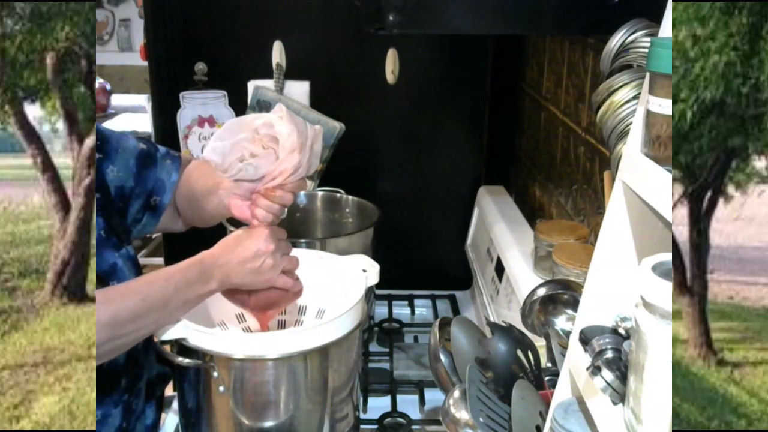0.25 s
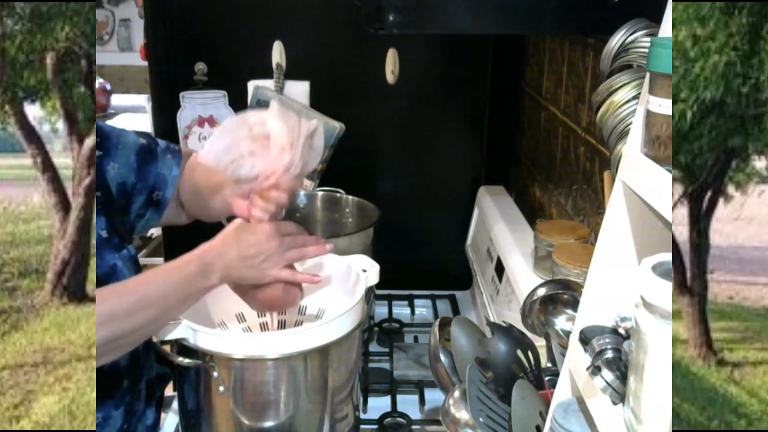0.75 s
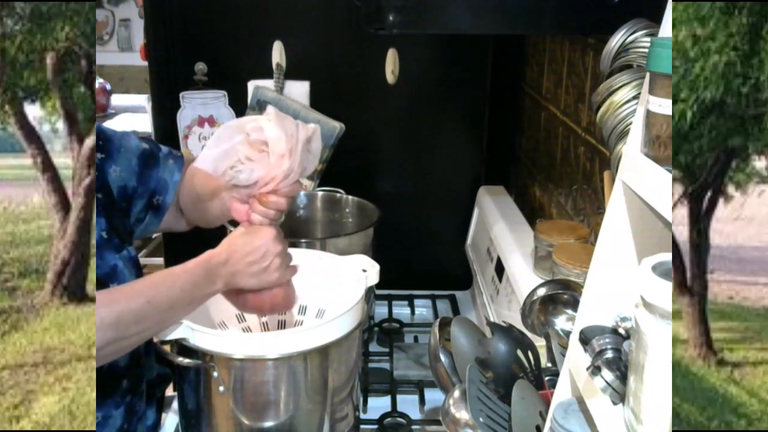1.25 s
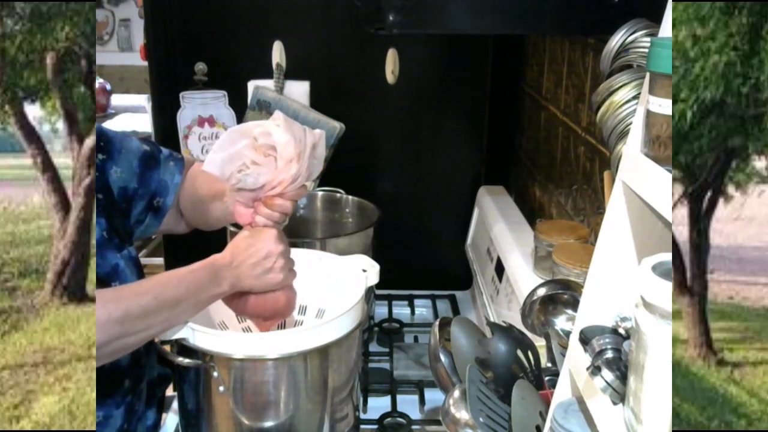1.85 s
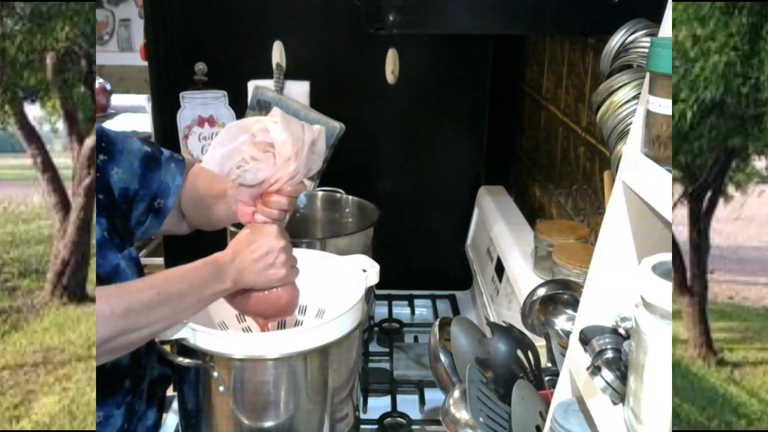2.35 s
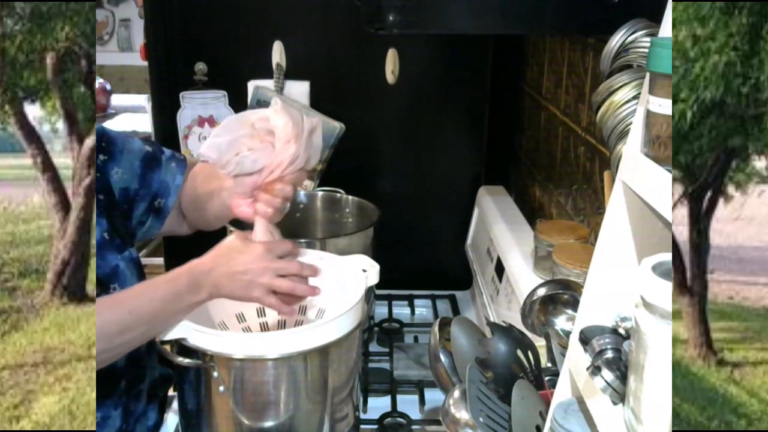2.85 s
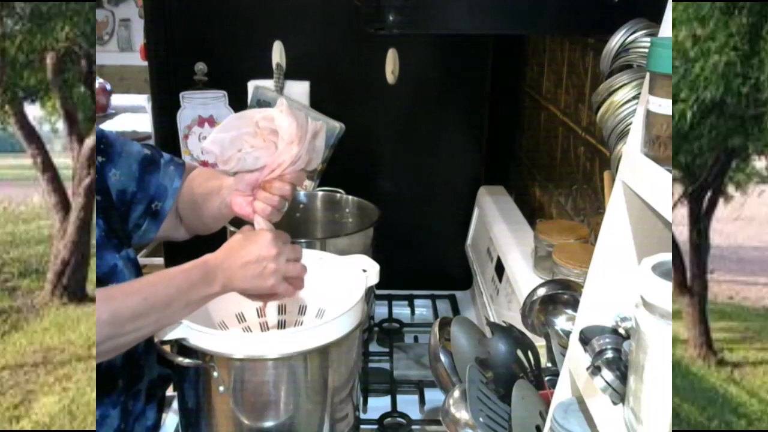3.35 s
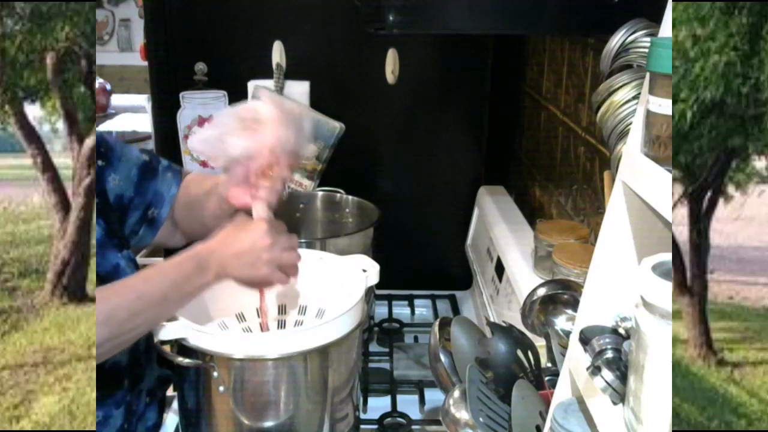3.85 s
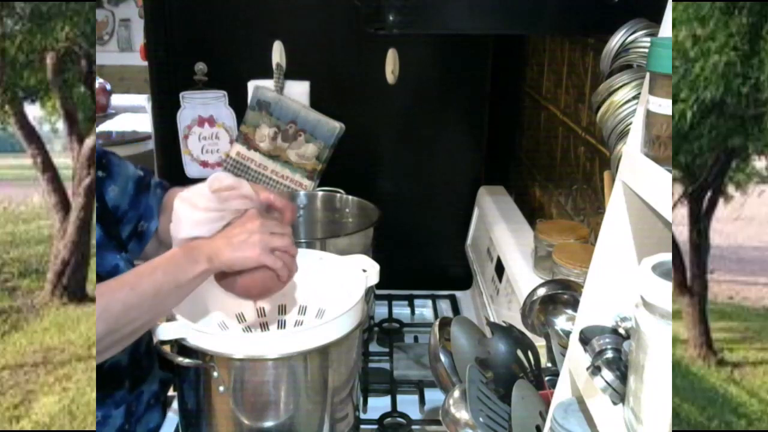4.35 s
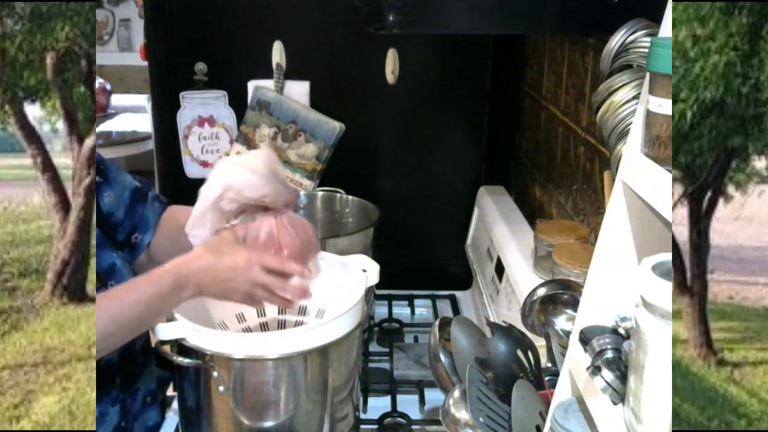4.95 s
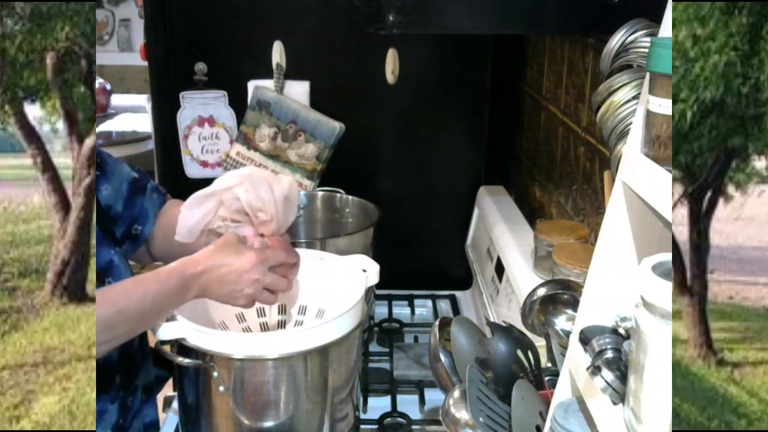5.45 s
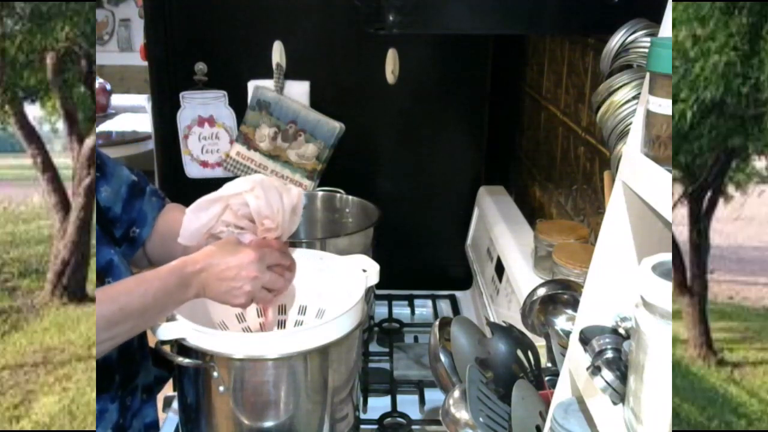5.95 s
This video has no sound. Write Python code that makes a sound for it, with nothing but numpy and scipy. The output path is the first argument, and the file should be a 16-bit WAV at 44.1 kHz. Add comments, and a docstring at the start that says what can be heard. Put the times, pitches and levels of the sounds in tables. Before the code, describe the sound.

Wet, frothy squeezing of a juice-soaked cloth over a metal pot, with bright bubble pops, brief squishes and hollow trickling run-off.

```python
"""Fruit pulp is wrung in a cloth bag over a colander in a tall steel pot, in a small kitchen.
From the start a squeeze presses froth through the weave, a noise crackle with ringing bubbles, while the
run-off gurgles through the pot's resonances over a low noise rumble and still air. Glided plunks, bright
pops and brief squishes join in turn; squeezes crowd together after 3 s, thin out after 4.6 s and return
from 5.4 s to the end."""
import sys
import numpy as np
from scipy import signal
from scipy.fft import rfft, irfft
from scipy.io import wavfile
from scipy.ndimage import uniform_filter1d

SR = 44100
rng = np.random.default_rng(int(sys.argv[2]) if len(sys.argv) > 2 else 0)


def unload_wav(signal):
    """Save mono or channel-first audio to the path in sys.argv[1] as 16-bit WAV at rate SR, clipped to [-1, 1]."""
    wavfile.write(
        sys.argv[1],
        SR,
        np.round(np.clip(np.atleast_2d(signal).T, -1, 1) * 32767).astype(np.int16),
    )


N = 272979
TIME = np.arange(N) / SR


def from_db(db):
    """Decibels to gain."""
    return 10 ** (np.asarray(db) / 20)


def rms_one(x):
    """Scale to rms 1."""
    return x / np.sqrt(np.mean(x ** 2) + 1e-20)


def in_time(rows):
    """Each column of a curve, interpolated at every sample."""
    s, *columns = np.transpose(rows)
    return [np.interp(TIME, s, c) for c in columns]


def add(out, s, sound):
    """Mix a sound in at a time in seconds."""
    at = int(np.clip(s * SR, 0, N - 1))
    out[at:at + len(sound)] += sound[:N - at]


def drift(knots_per_s):
    """Random curve: unit-spread Gaussian knots joined by lines."""
    knots = rng.standard_normal(2048)
    return np.interp(TIME * knots_per_s, np.arange(len(knots)), knots)


def colour(x, spectrum):
    """Filter by a curve in dB over log frequency."""
    hz, db = np.transpose(spectrum)
    grid = np.maximum(np.fft.rfftfreq(N, 1 / SR), 1)
    gain = from_db(np.interp(np.log(grid), np.log(hz), db))
    return irfft(rfft(x) * gain, N)


def even(x, span_s):
    """Hold the short-term rms at 1, leaving the grain."""
    power = uniform_filter1d(x ** 2, int(span_s * SR) + 1)
    return x / np.sqrt(np.abs(power) + 1e-12)


def resonance(x, hz, t60):
    """Two-pole ringing band, about unit gain at its peak; t60 in seconds."""
    r = from_db(-60 / (t60 * SR))
    zeros = (1 - r * r) / 2 * np.array([1, 0, -1])
    poles = [1, -2 * r * np.cos(2 * np.pi * hz / SR), r * r]
    return signal.lfilter(zeros, poles, x + 1e-18)


def bubble(hz, cycles, rise, swell):
    """A bubble swells, rings and glides in pitch as it nears the surface; envelope peak 1."""
    t60_samples = cycles / hz * SR
    age = np.arange(int(t60_samples) + 2) / t60_samples
    shape = (1 - np.exp(-age / swell)) * np.exp(-np.log(1000) * age)
    phase = 2 * np.pi * hz / SR * np.cumsum(1 + rise * (age - swell))
    return shape / shape.max() * np.sin(phase)


def stream(per_s, low_hz, high_hz, cycles, rise, spread_db):
    """Bubbles of many sizes form at random; most are faint, a few stand out."""
    out = np.zeros(N)
    for when, size, strength, sign in rng.random((16000, 4))[:int(per_s * N / SR)]:
        ring = bubble(low_hz * (high_hz / low_hz) ** size, cycles, rise, swell=0.042)
        gain = from_db(spread_db * min(-np.log(1 - strength), 4))
        add(out, when * N / SR, np.sign(sign - .5) * gain * ring)
    return out


def scatter(x, t60, delay_s):
    """A dense decaying cloud of reflections with unit energy."""
    t = TIME[:SR // 2]
    echoes = rng.standard_normal(len(t)) * np.exp(-np.log(1000) * t / t60) * (t > delay_s)
    return signal.fftconvolve(x, echoes / np.linalg.norm(echoes))[:N]


HANDS_MOVE_PER_S = 9


def shifting_scatter(x, t60, delay_s, count=3):
    """The bag moves in the hands, so its early reflections keep changing."""
    shares = np.array([drift(HANDS_MOVE_PER_S) for _ in range(count)])
    shares /= np.linalg.norm(shares, axis=0)
    return sum(scatter(x * share, t60, delay_s) for share in shares)


def kitchen(x, near_db, far_db):
    """Colander and stove answer at once, the walls later; loudness is roughly kept."""
    near, far = from_db(near_db), from_db(far_db)
    early = near * shifting_scatter(x, t60=0.083, delay_s=0.0017)
    late = far * scatter(x, t60=0.38, delay_s=0.0041)
    return (x + early + late) / np.sqrt(1 + near ** 2 + far ** 2)


# Ringing of the pot's steel wall. Each row: frequency in Hz, level in dB against ring_db.
STEEL_MODES = [(3400, 5), (3924, -4), (4295, -8), (4857, 5.5), (5834, -20), (6282, -3), (6816, 3),
               (7266, -4.5), (8048, -13)]


def steel(x, ring_db, t60):
    """Sharp sounds set the pot wall ringing faintly."""
    return x + sum(from_db(ring_db + db) * resonance(x, hz, t60) for hz, db in STEEL_MODES)


ATTACK_POWER = 1.18   # the pressure builds slowly at first
SAG_DB_PER_S = 10   # runs throughout, on top of the release


def swell_and_fade(start, attack, hold, release_db_per_s):
    """Attack, a slightly sagging hold, then a steady fall in dB."""
    age = np.maximum(TIME - start, 0)
    rise = np.minimum(age / max(attack, 1 / SR), 1) ** ATTACK_POWER
    released_s = np.maximum(age - attack - hold, 0)
    return rise * from_db(-SAG_DB_PER_S * age - release_db_per_s * released_s)


# Squeezes of the bag. Each row: start in seconds before the layer's lag, attack in seconds, hold in
# seconds, release in dB per second before the layer's factor, then fizz, finest spray, squelch and
# wet slop levels in dB.
SQUEEZES = [(0.0, 0.00037, 0.57, 23, -46, -53, -50.5, -65), (0.183, 0.009, 0.036, 77, -56, -51, -52, -61.5),
            (0.854, 0.014, 0.013, 138, -57, -90, -63.5, -67),
            (1.045, 0.062, 0.021, 124, -54, -98, -56.5, -63),
            (1.138, 0.023, 0.01, 152, -51, -100, -61.5, -68),
            (1.424, 0.0075, 0.055, 87, -60.5, -83, -61, -69),
            (1.656, 0.065, 0.32, 41.5, -47, -52.5, -54, -76.5),
            (1.804, 0.02, 0.013, 169, -64, -71, -52.5, -66.5),
            (2.35, 0.021, 0.017, 34.5, -55.5, -66.5, -68.5, -77),
            (2.53, 0.016, 0.06, 86, -49.5, -54.5, -53.5, -63.5),
            (3.178, 0.062, 0.0081, 86, -51.5, -66, -90, -77), (3.24, 0.032, 0.12, 87, -51, -60.5, -58, -79),
            (3.423, 0.027, 0.014, 124, -52.5, -55, -60.5, -96),
            (3.532, 0.019, 0.073, 177, -55.5, -57, -71, -77),
            (3.636, 0.011, 0.014, 167, -66, -57.5, -69, -91),
            (3.701, 0.008, 0.05, 138, -60, -68, -76.5, -73.5),
            (3.836, 0.055, 0.14, 66, -55.5, -74, -65.5, -74.5),
            (3.959, 0.057, 0.0082, 146, -55, -67, -50.5, -71),
            (4.119, 0.021, 0.062, 135.5, -60.5, -66.5, -53, -73.5),
            (4.432, 0.0068, 0.0071, 91, -70, -81, -99, -81.5),
            (4.57, 0.032, 0.22, 120, -75, -91.5, -99, -91),
            (5.352, 0.053, 0.069, 46, -59.5, -67.5, -70.5, -85),
            (5.548, 0.023, 0.064, 133, -48.5, -69, -50.5, -66.5),
            (5.721, 0.029, 0.32, 63, -50.5, -54, -53, -67.5),
            (6.116, 0.01, 0.0057, 202, -76, -59, -50.5, -87)]
# Wet cloth between squeezes. Columns: fizz, spray, squelch and slop levels in dB.
REST_LEVELS_DB = (-99, -104, -89.5, -86.5)
RELEASE_FACTORS = (1, 2.3, 1.23, 0.55)   # same order: spray dies fastest, slop slowest
LAGS_S = (0.012, 0.00059, 0.0036, 0.0036)


def squeezing():
    """Gains of fizz, spray, squelch and slop; overlapping squeezes add in power."""
    power = from_db(REST_LEVELS_DB)[:, None] ** 2 * np.ones(N)
    for start, attack, hold, release, *levels_db in SQUEEZES:
        for layer, (db, factor, lag) in enumerate(zip(levels_db, RELEASE_FACTORS, LAGS_S)):
            envelope = swell_and_fade(start + lag, attack, hold, release * factor)
            power[layer] += (from_db(db) * envelope) ** 2
    return np.sqrt(power)


def froth(bubbles, spectrum, tears_per_s, spread_db, ring_db):
    """Thin films tear in a dense crackle; some of the bubbles ring within it."""
    sizes = rng.choice([-1, 1], N) * from_db(spread_db * np.minimum(rng.exponential(1, N), 4))
    hits = sizes * (rng.random(N) < tears_per_s / SR)
    tears = signal.lfilter([1], [1, -.85], hits + 1e-18)
    return rms_one(colour(tears, spectrum)) + from_db(ring_db) * rms_one(colour(bubbles, spectrum))


PATCH_DB, PATCH_PER_S, PATCHES_PER_OCTAVE = 3.5, 55, 4.5


def ragged(x, count=6):
    """Bubbles of one size come in spurts, so neighbouring bands flicker on their own."""
    band = PATCHES_PER_OCTAVE * np.log2(np.maximum(np.fft.rfftfreq(N, 1 / SR), 1))
    spectrum = rfft(x)
    out = np.zeros(N)
    for k in range(count):
        share = np.maximum(1 - np.abs((band - k) % count - count / 2), 0)
        out += from_db(PATCH_DB * drift(PATCH_PER_S)) * irfft(spectrum * share, N)
    return out


# Colours of the four froth layers. Each row: frequency in Hz, relative level in dB.
FIZZ_COLOUR = [(2300, -59), (3200, -30.5), (4300, -15.5), (5300, -5), (6500, 1), (7400, -2), (8200, -19),
               (9200, -40), (12000, -72)]
SPRAY_COLOUR = [(4000, -50.5), (7000, 5), (8100, 5), (9000, -2.5), (10000, -12.5), (11500, -27),
                (13500, -39.5)]
SQUELCH_COLOUR = [(900, -59), (1900, -18), (2600, -12), (3300, -5), (4800, -0.5), (5600, -1), (8000, -47)]
SLOP_COLOUR = [(400, -40), (850, 6), (1400, 3.5), (2100, 3), (2800, -1.5), (5000, -40.5)]
SPUTTER_DB, SPUTTER_PER_S = 2, 22   # the weave lets each size of bubble through unevenly
SPIT_DB, SPIT_PER_S = 1.2, 130   # the froth comes through in tiny clumps


def cloth():
    """Froth and pulp pressed through the weave: the finer the bubbles, the higher they sound."""
    fizz = stream(per_s=1300, low_hz=3580, high_hz=8200, cycles=22, rise=.08, spread_db=5.5)
    fizz = froth(fizz, FIZZ_COLOUR, tears_per_s=3200, spread_db=5.2, ring_db=0)
    fizz = kitchen(steel(fizz, ring_db=-2.0, t60=0.051), near_db=1.0, far_db=-8.0)

    spray = stream(per_s=1000, low_hz=7740, high_hz=12010, cycles=90, rise=0.06, spread_db=6.0)
    spray = froth(spray, SPRAY_COLOUR, tears_per_s=2200, spread_db=6.5, ring_db=-2)
    spray = kitchen(spray, near_db=8.0, far_db=-17.0)

    squelch = stream(per_s=480, low_hz=2018, high_hz=4585, cycles=48, rise=0.12, spread_db=4.5)
    squelch = froth(squelch, SQUELCH_COLOUR, tears_per_s=2400, spread_db=4.8, ring_db=2)
    squelch = kitchen(steel(squelch, ring_db=-7, t60=0.017), near_db=0.5, far_db=1)

    slop = stream(per_s=450, low_hz=849, high_hz=2300, cycles=40, rise=0.1, spread_db=3.0)
    slop = froth(slop, SLOP_COLOUR, tears_per_s=900, spread_db=4.0, ring_db=2)
    slop = kitchen(slop, near_db=7.5, far_db=-3.5)

    layers = (even(fizz, 0.058), even(spray, 0.096), even(squelch, 0.11), even(slop, 0.17))
    mix = np.zeros(N)
    for gain, layer in zip(squeezing(), layers):
        mix += gain * from_db(SPUTTER_DB * drift(SPUTTER_PER_S)) * layer
    return from_db(SPIT_DB * drift(SPIT_PER_S)) * ragged(mix)


# Air and wall resonances of the pot. Each row: frequency in Hz, level in dB, t60 in seconds.
POT_MODES = [(175.6, 3.5, 0.48), (245, -7, 0.26), (310.5, -8.5, 0.11), (319.2, -5, 0.43), (361.5, -7, 0.39),
             (395, -6.5, 0.16), (553.5, 10, 0.62), (606.7, 11.5, 0.12), (709, 4, 0.13), (809, 1.5, 0.093)]


def pot(x, direct_db):
    """Sound leaves the pot partly straight, partly through its resonances."""
    ringing = sum(from_db(db) * resonance(x, hz, t60) for hz, db, t60 in POT_MODES)
    return from_db(direct_db) * x + ringing


# Steady run-off into the pot. Each row: time in seconds, gurgle level in dB before GURGLE_DB.
RUNOFF = [(0.0, -60.5), (0.45, -70.5), (1.05, -68.5), (1.35, -60.5), (2.4, -60.5), (3.0, -57.5), (3.9, -57),
          (4.45, -65), (4.95, -69.5), (5.3, -61), (5.5, -72), (6.19, -64)]
# Gushes through the colander holes. Each row: start in seconds, hold in seconds, light trickle level
# in dB, deep gurgle level in dB before GURGLE_DB.
GUSHES = [(0.206, 0.087, -56, -57.5), (0.353, 0.24, -56.5, -90), (0.715, 0.12, -66, -58),
          (0.836, 0.18, -59, -79), (1.116, 0.088, -61, -58.5), (1.666, 0.18, -55.5, -76),
          (1.919, 0.12, -54, -53), (2.138, 0.12, -58, -78), (2.577, 0.13, -74, -54),
          (3.137, 0.11, -62.5, -55), (3.4, 0.068, -76, -60), (3.523, 0.12, -65, -53),
          (3.746, 0.043, -61.5, -55.5), (4.105, 0.1, -57, -51), (4.518, 0.17, -62.5, -68),
          (4.72, 0.13, -74.5, -68.5), (5.044, 0.087, -65, -67.5), (5.217, 0.11, -69, -74),
          (5.594, 0.14, -63, -56.5), (5.743, 0.13, -61.5, -53)]
GUSH_ATTACK_S, GUSH_RELEASE_DB_PER_S = 0.013, 153
DRIBBLE_DB, DRIBBLE_FOLLOWS = -74, 0.85   # trickle at mean run-off; share of the run-off's dB swing


def flowing():
    """Gains of trickle and gurgle: gushes add in power to the steady run-off."""
    runoff_db, = in_time(RUNOFF)
    dribble_db = DRIBBLE_DB + DRIBBLE_FOLLOWS * (runoff_db - runoff_db.mean())
    power = from_db([dribble_db, runoff_db]) ** 2
    for start, hold, *levels_db in GUSHES:
        envelope = swell_and_fade(start, GUSH_ATTACK_S, hold, GUSH_RELEASE_DB_PER_S)
        power += (from_db(levels_db)[:, None] * envelope) ** 2
    return np.sqrt(power)


# Colours of the juice. Each row: frequency in Hz, relative level in dB.
GURGLE_COLOUR = [(60, -37.5), (130, -17), (175, -12.5), (310, -0.5), (400, 0.5), (480, -4.5), (700, -44.5)]
TRICKLE_COLOUR = [(350, -13), (470, -4), (590, -4.5), (710, -5), (850, -10.5), (1100, -8.5), (1500, -9),
                  (2000, -43)]
GURGLE_DB = -2.5


def juice():
    """Run-off: large bubbles gurgle and small ones trickle, through the pot's resonances."""
    trickle_gain, gurgle_gain = flowing()
    deep = stream(per_s=110, low_hz=154.2, high_hz=456.4, cycles=18.3, rise=0.88, spread_db=4.0)
    light = stream(per_s=210, low_hz=475.1, high_hz=1295, cycles=47.0, rise=0.27, spread_db=1.5)
    deep = pot(kitchen(deep, near_db=-17.5, far_db=-5.5), direct_db=-13)
    light = pot(kitchen(light, near_db=-1.5, far_db=-4.0), direct_db=-11.5)
    gurgle = even(colour(deep, GURGLE_COLOUR), span_s=0.088)
    trickle = even(colour(light, TRICKLE_COLOUR), span_s=.08)
    return from_db(GURGLE_DB) * gurgle_gain * gurgle + trickle_gain * trickle


# Each row: time in seconds, rumble level in dB before RUMBLE_TRIM_DB.
RUMBLE_LEVEL = [(0, -82), (0.3, -78), (0.55, -76.5), (0.85, -68.5), (1.05, -86), (1.42, -62), (1.57, -82),
                (1.72, -68), (2.05, -64), (2.3, -70), (3.2, -63.5), (3.38, -91), (3.58, -62.5), (3.77, -80),
                (3.9, -66), (4.25, -72), (4.9, -84), (5.4, -70), (5.58, -83), (5.75, -66.5), (6.19, -75.5)]
# Each row: frequency in Hz, relative level in dB.
RUMBLE_COLOUR = [(20, -12), (42, 1.5), (50, 2), (58.5, 11), (68, -4), (80, -10), (115, 4), (170, -25),
                 (560, -85)]
RUMBLE_TRIM_DB, LUMP_DB, LUMPS_PER_S = -1.0, 6.5, 21


def rumble():
    """An uneven low rumble under the work: lumpy low noise that comes and goes."""
    level_db, = in_time(RUMBLE_LEVEL)
    lumps = colour(rng.standard_normal(N), RUMBLE_COLOUR) * from_db(LUMP_DB * drift(LUMPS_PER_S))
    return from_db(level_db + RUMBLE_TRIM_DB) * even(lumps, span_s=0.27)


# Each row: frequency in Hz, relative level in dB.
STILL_COLOUR = [(50, -11), (200, 3), (500, 11.5), (1200, -7.5), (3000, -29), (7000, -73), (10000, -38),
                (15000, -13)]
STILL_DB = -80.5


def room_tone():
    """Still air: steady coloured noise."""
    return from_db(STILL_DB) * rms_one(colour(rng.standard_normal(N), STILL_COLOUR))


# Largest air pockets in the juice. Each row: start in seconds, pitch in Hz, level in dB before
# PLUNK_TRIM_DB and the pot.
PLUNKS = [(0.022, 304, -51), (0.259, 2250, -46), (0.339, 1890, -46), (0.505, 310, -49.5), (0.52, 600, -58),
          (0.783, 177.6, -55.5), (0.868, 599, -52), (0.896, 581, -52), (1.29, 314, -50.5),
          (1.371, 582, -54.5), (1.446, 317, -51.5), (1.593, 292, -48.5), (1.681, 637, -59),
          (1.745, 175, -54), (1.777, 634, -64), (1.816, 342, -53), (1.879, 314, -51.5), (1.989, 538, -51.5),
          (2.016, 336, -50.5), (2.151, 588, -50), (2.241, 599, -54.5), (2.37, 377, -52.5),
          (2.58, 177, -49.5), (2.653, 287, -43.5), (2.674, 285, -44.5), (2.68, 569, -49),
          (2.863, 563, -54.5), (2.954, 317, -47), (3.098, 320, -49), (3.13, 180, -55), (3.17, 561, -50.5),
          (3.24, 340, -46), (3.409, 341, -52), (3.42, 537, -53.5), (3.473, 395, -51), (3.558, 538, -48.5),
          (3.59, 547, -46), (3.605, 377, -56), (3.661, 420, -52), (3.691, 319, -50.5), (3.782, 300, -49.5),
          (3.784, 614, -60.5), (3.825, 302, -51), (3.852, 246, -51.5), (4.118, 596, -61),
          (4.149, 388, -50.5), (4.295, 322, -52), (4.416, 294, -54), (4.557, 328, -53.5), (4.602, 718, -57),
          (4.78, 712, -62), (4.834, 357, -56.5), (4.966, 369, -56), (5.076, 383, -51), (5.108, 350, -55),
          (5.16, 656, -61.5), (5.222, 630, -56), (5.28, 311, -50.5), (5.645, 1970, -53), (5.621, 735, -50),
          (5.647, 321, -48), (5.782, 327, -51), (5.794, 177, -54.5), (5.829, 314, -42)]
PLUNK_TRIM_DB, SURFACING_S = -1.0, 0.0058


def plunks():
    """Larger air pockets plunk in the pot, each with a glide of its own."""
    out = np.zeros(N)
    for (s, hz, db), glide in zip(PLUNKS, rng.standard_normal(len(PLUNKS))):
        cycles = 27 * np.sqrt(hz / 320)   # small bubbles ring for more cycles
        ring = bubble(hz, cycles, rise=0.15 + 0.22 * glide, swell=0.1906)
        surfacing = np.minimum(TIME[:len(ring)] / SURFACING_S, 1)   # opens near the surface
        add(out, s, from_db(db + PLUNK_TRIM_DB) * ring * surfacing)
    return pot(out, direct_db=-1.5)


# Largest froth bubbles bursting on the cloth. Each row: start in seconds, peak of the dry ring in dB,
# pitch in Hz.
POPS = [(0.065, -39.5, 3370), (0.079, -31, 6250), (0.132, -39, 4860), (0.193, -38, 6500),
        (0.215, -38.5, 3850), (0.23, -41, 4830), (0.453, -25, 7040), (0.4557, -26.5, 6330),
        (0.560, -39, 3510), (0.597, -32, 5770), (0.604, -45, 4300), (0.609, -42.5, 3800),
        (0.6647, -27.5, 6600), (0.766, -46, 3270), (0.789, -41, 3420), (0.843, -40, 3305),
        (1.113, -42, 5040), (1.2182, -45.5, 5000), (1.264, -41.5, 5730), (1.454, -41.5, 3140),
        (1.8397, -42.5, 3400), (1.898, -33, 6740), (1.9483, -27, 6660), (1.993, -30, 7900),
        (2.0418, -34.5, 7000), (2.543, -39, 4600), (2.553, -49.5, 2660), (2.557, -36, 8060),
        (2.559, -38, 3930), (2.561, -36, 6400), (2.678, -37.5, 4690), (2.858, -50, 3260),
        (2.862, -50.5, 4950), (2.864, -41, 3720), (3.004, -45.5, 6170), (3.241, -36, 6540),
        (3.296, -39, 4300), (3.322, -33.5, 6640), (3.335, -31, 6580), (3.3757, -35, 6820),
        (3.402, -34.5, 7430), (3.5553, -43, 6760), (3.597, -39, 6100), (3.694, -38.5, 7040),
        (3.838, -34, 6970), (3.922, -41, 6800), (4.028, -41.5, 2960), (4.157, -47, 3340),
        (4.164, -35, 6260), (4.17, -44.5, 4430), (4.195, -27, 6400), (4.613, -50.5, 6800),
        (5.041, -47.5, 5250), (5.378, -46, 7200), (5.572, -48, 2626), (5.607, -37.5, 3880),
        (5.66, -41, 8000), (5.682, -42, 3500), (5.7454, -36.5, 5700), (5.7577, -37, 6500),
        (5.775, -37, 7200), (5.778, -43, 4360), (5.8497, -33, 6040), (5.850, -41.5, 3600),
        (5.864, -39, 6500), (5.906, -32.5, 7060), (5.95, -36.5, 6900), (6.015, -29.5, 7260),
        (6.015, -43, 4500), (6.127, -45, 3400), (6.132, -31.5, 8250)]
POP_CYCLES, POP_LOWPASS_HZ = 45, 8400
POP_SPRAY_DB, POP_SPRAY_PEAK_S = -11, 0.0038   # level against the ring; time to its peak
BOUNCE_S, BOUNCE_LOSS_DB = .0033, 8.5   # echoes between pot, colander and stove


def pops():
    """A larger bubble bursts with a short clear ring and a little spray; the ring echoes thrice."""
    out, t = np.zeros(N), TIME[:SR // 20]
    spray_shape = t / POP_SPRAY_PEAK_S * np.exp(1 - t / POP_SPRAY_PEAK_S)
    for (s, db, hz), chance in zip(POPS, rng.standard_normal((len(POPS), len(t)))):
        ring = from_db(db) * bubble(hz, POP_CYCLES, rise=.06, swell=.12)
        for k in range(4):
            delay_s = BOUNCE_S * k * (1 + .1 * chance[k])
            add(out, s + delay_s, from_db(-BOUNCE_LOSS_DB * k) * ring)
        spit = resonance(resonance(chance, hz, t60=6 / hz), hz, t60=6 / hz)
        add(out, s, from_db(db + POP_SPRAY_DB) * rms_one(spit) * spray_shape)
    out = signal.sosfilt(signal.butter(8, POP_LOWPASS_HZ, fs=SR, output="sos"), out)
    return kitchen(steel(out, ring_db=-6.0, t60=0.56), near_db=-5.5, far_db=-8.0)


# Air squishing out of wet folds as the grip shifts. Each row: start in seconds, hold in seconds,
# level in dB, pitch in Hz.
SQUISHES = [(0.216, 0.026, -77, 1150), (0.596, 0.12, -67.5, 990), (1.118, 0.011, -67, 2200),
            (1.218, 0.016, -76, 1070), (1.788, 0.059, -59.5, 2310), (2.559, 0.02, -59, 950),
            (2.592, 0.016, -58.5, 1580), (2.663, 0.04, -65.5, 1380), (2.846, 0.03, -68, 2060),
            (3.484, 0.016, -77, 2040), (4.124, 0.015, -59.5, 1910), (4.188, 0.015, -58.5, 1750),
            (4.205, 0.047, -56.5, 830), (4.337, 0.018, -67, 1120), (4.518, 0.019, -73.5, 1990),
            (4.582, 0.016, -72, 1130), (4.713, 0.016, -74, 1200), (4.96, 0.086, -79.5, 2270),
            (5.237, 0.04, -82.5, 2420), (5.407, 0.14, -75, 2120), (5.554, 0.13, -62, 2060),
            (6.04, 0.11, -62, 2170)]
SQUISH_ATTACK_S, SQUISH_RELEASE_DB_PER_S, SQUISH_CYCLES = 0.011, 267.5, 22


def squishes():
    """A short crowd of bubbles, coloured by the fold that they escape from."""
    bubbles = stream(per_s=1200, low_hz=866, high_hz=3330, cycles=26, rise=0.14, spread_db=3.5)
    bubbles = kitchen(bubbles, near_db=10.5, far_db=-6)
    out = np.zeros(N)
    for s, hold, db, hz in SQUISHES:
        envelope = swell_and_fade(s, SQUISH_ATTACK_S, hold, SQUISH_RELEASE_DB_PER_S)
        fold = even(resonance(bubbles, hz, SQUISH_CYCLES / hz), span_s=0.066)
        out += from_db(db) * envelope * fold
    return out


def scene():
    """Bag, pot and room at one microphone."""
    return (cloth() + juice() + rumble() + room_tone() + plunks() + pops() + squishes())[None]


CUTOFF_HZ = 15400


def record(dry):
    """The top is cut by a steep low-pass."""
    return signal.sosfilt(signal.cheby2(12, 70, CUTOFF_HZ, fs=SR, output="sos"), dry)


dry = scene()
out = record(dry)
unload_wav(out)
```